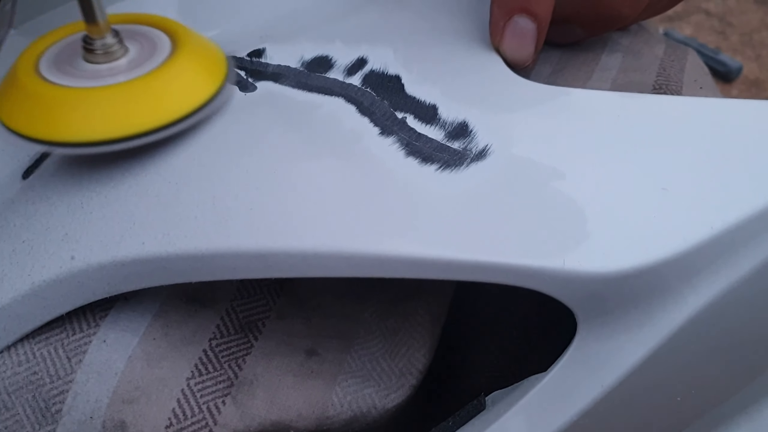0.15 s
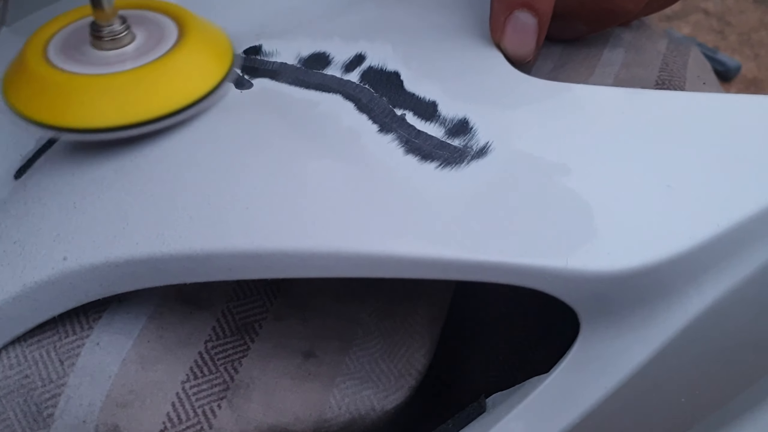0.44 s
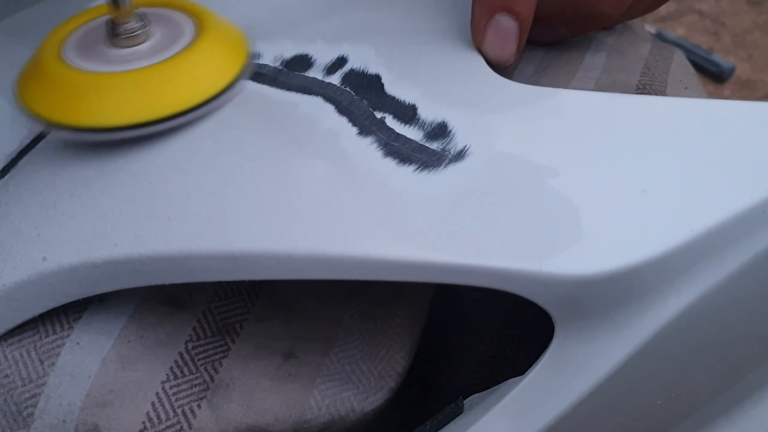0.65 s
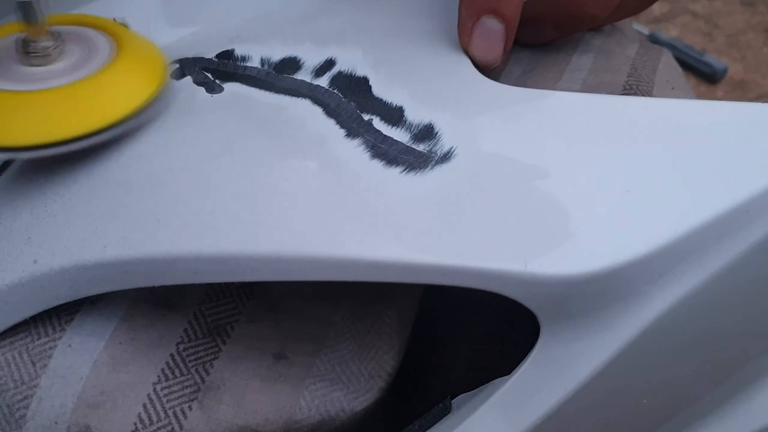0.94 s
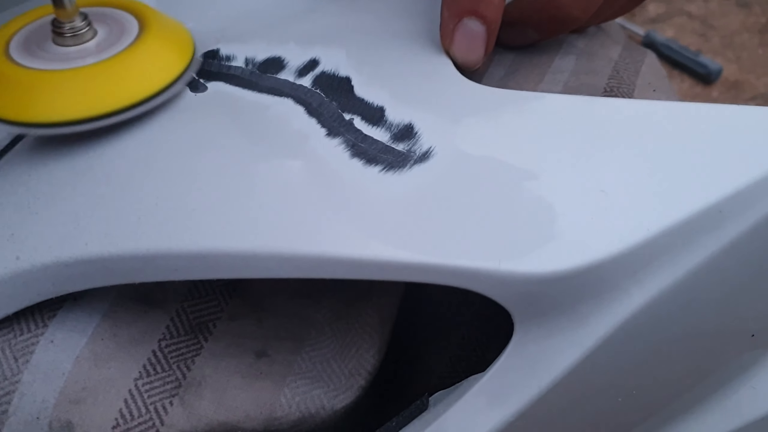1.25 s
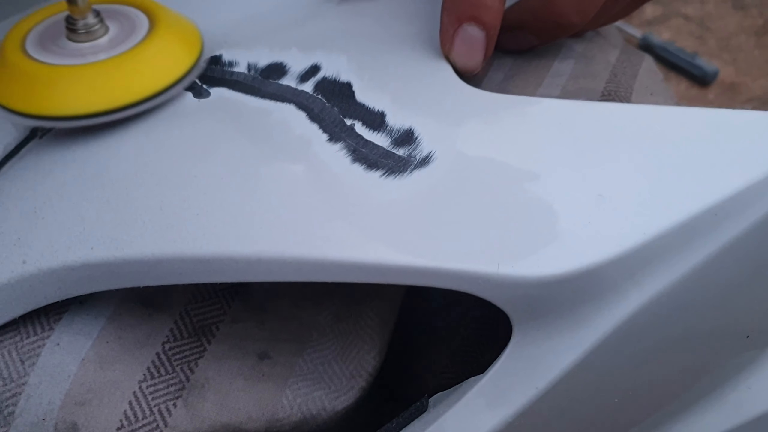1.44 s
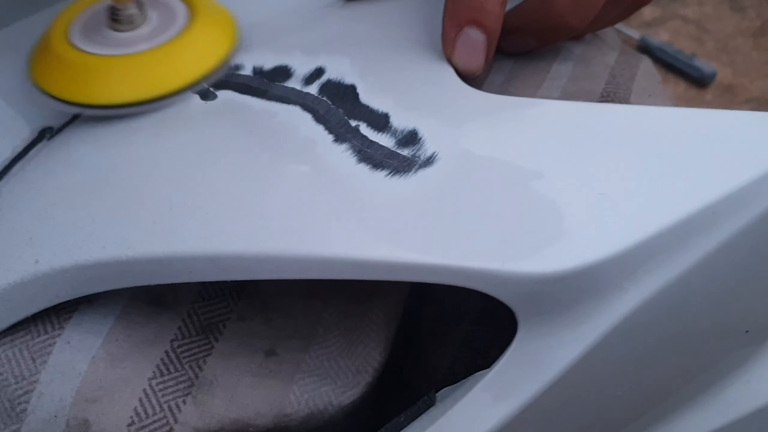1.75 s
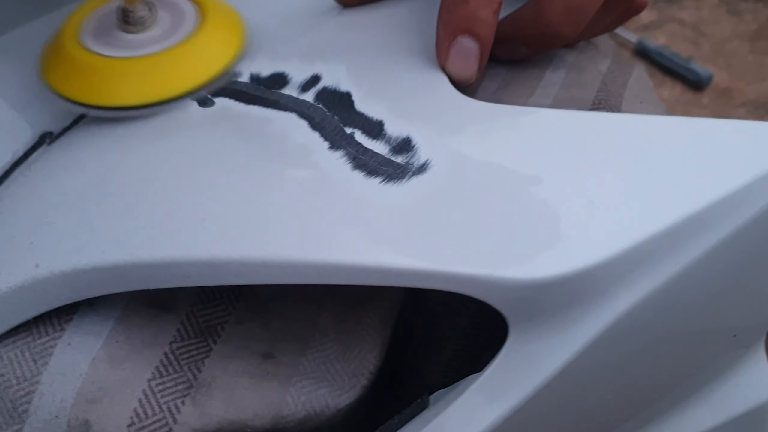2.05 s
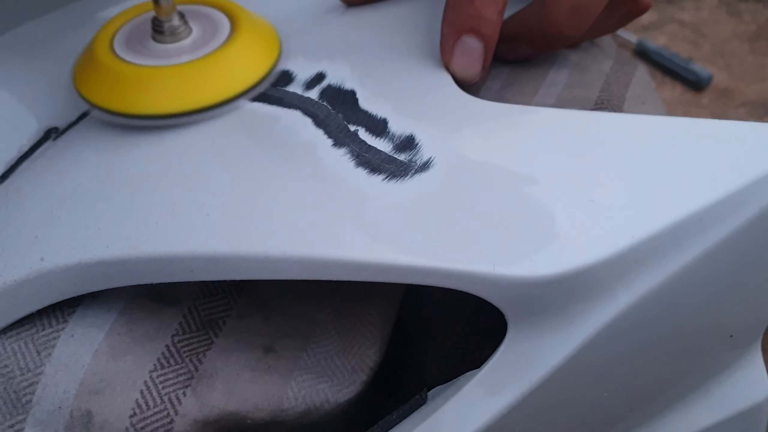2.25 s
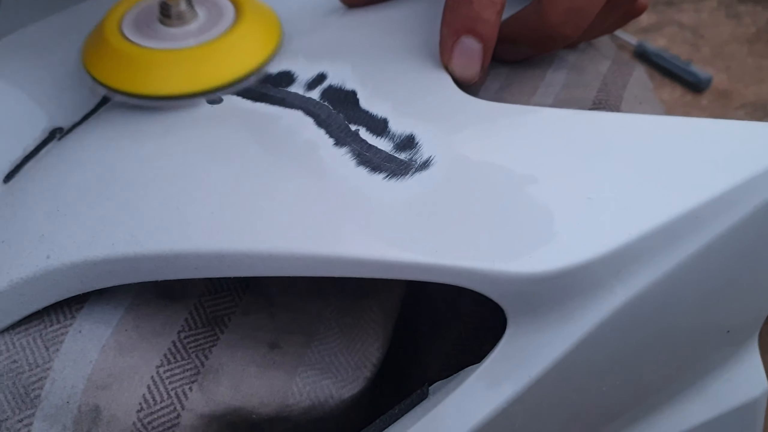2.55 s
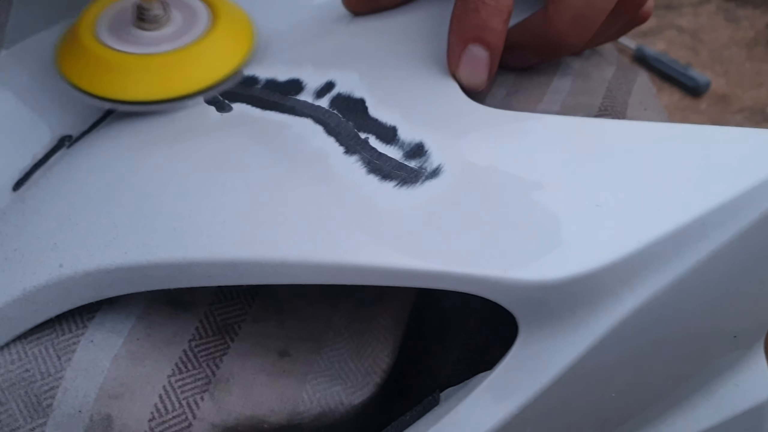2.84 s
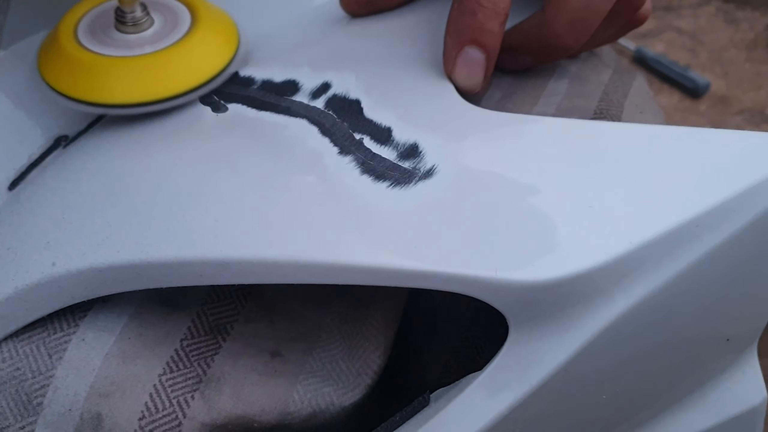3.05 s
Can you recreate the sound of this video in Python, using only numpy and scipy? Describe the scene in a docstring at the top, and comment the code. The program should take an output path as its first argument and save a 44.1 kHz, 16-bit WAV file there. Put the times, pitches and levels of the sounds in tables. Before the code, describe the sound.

A small power sander whirs and hisses close by in a garage. Its disc rasps and buzzes on a plastic panel in one pass, two quick touches and a longer pass, the motor sagging under pressure and recovering between.

```python
"""Power sander on a plastic panel

A small sander with a spinning disc is pressed four times on a plastic panel in a garage.
The disc runs off true: once per turn its edge rasps (shaped noise) and knocks the panel (pulses into modes).
The motor (shaft harmonics and fan noise) sags under load and whirs and hisses louder as it picks up again."""
import sys
import numpy as np
from scipy import signal
from scipy.fft import rfft, irfft
from scipy.io import wavfile
from scipy.ndimage import uniform_filter1d

SR = 44100
rng = np.random.default_rng(int(sys.argv[2]) if len(sys.argv) > 2 else 0)


def master_out(mix):
    """Clip the mix to full scale and print it as 16-bit PCM to the path in sys.argv[1]."""
    frames = np.transpose(np.atleast_2d(mix))
    ceiling = np.clip(frames, -1, 1)
    pcm = np.round(ceiling * 32767).astype(np.int16)
    wavfile.write(sys.argv[1], SR, pcm)


N = 141120
T = np.arange(N) / SR
HZ = np.fft.rfftfreq(N, 1 / SR)


def amp(db):
    """Decibels to gain."""
    return 10 ** (np.asarray(db) / 20)


def evened(x):
    """Scales to rms 1."""
    return x / np.sqrt(np.mean(x ** 2) + 1e-20)


def read(points, hz):
    """Reads a table on a log-frequency axis."""
    table_hz, value = np.transpose(points)
    return np.interp(np.log(hz + 1), np.log(table_hz + 1), value)


def colour(x, points):
    """Causal minimum-phase filter with the given spectrum."""
    log_gain = np.log(amp(read(points, abs(np.fft.fftfreq(N, 1 / SR)))))
    response = np.exp(np.conj(signal.hilbert(log_gain)))
    return irfft(rfft(x) * response[:len(HZ)], N)


# likeness of the two sides: [freq_hz, correlation_0_to_1]
SIDE_LIKENESS = [(100,0.75),(2000,0.97),(3000,0.16),(7000,0.077),(10000,0.23),(12000,0.3),(16000,0.32)]


def paired(two):
    """Makes two unrelated noises partly alike, as the two microphones hear them."""
    a, b = rfft(two)
    same = read(SIDE_LIKENESS, HZ)
    return irfft(np.array([a, same * a + np.sqrt(1 - same ** 2) * b]), N)


def patchy(x, depth_db):
    """Lets the colour of a noise wander at random, alike on both sides."""
    z = signal.stft(x, nperseg=256)[2]
    field = rng.standard_normal(z.shape[1:])
    field = uniform_filter1d(field, size=7, axis=0)  # across frequency
    field = uniform_filter1d(field, size=30, axis=1)  # across time
    return signal.istft(z * amp(depth_db * evened(field)), nperseg=256)[1][:, :N]


def wander(count=14):
    """A slow random curve of rms 1, from sines of 1 to 10 Hz."""
    t = np.linspace(0, T[-1], count ** 2)
    waves = sum(np.sin(2 * np.pi * (f * t + rng.random())) for f in np.geomspace(1, 10, count))
    return evened(np.interp(T, t, waves))


# one curve per touch of the disc, relative levels:
# [time_s, rasp_db, drone_db, middle_modes_db, buzz_db]
FIRST_PASS_CURVE = [(0.233, -46, -50, -36, -49), (0.253, -31, -39.5, -48, -40.5),
                    (0.299, -35, -49, -35, -55.5), (0.333, -27, -37.5, -50, -43.5),
                    (0.443, -27.5, -37.5, -48, -39.5), (0.51, -31, -42.5, -58, -39),
                    (0.637, -24, -43, -40.5, -47), (0.775, -31, -47, -52, -45.5),
                    (0.815, -46, -56, -44.5, -60)]
DAB_CURVE = [(0.863, -39, -54, -60, -47), (0.886, -26, -40.5, -42, -54), (0.951, -27, -41, -52, -44),
             (0.999, -49.5, -60, -43, -56)]
GRAZE_CURVE = [(1.226, -35, -53, -47, -41), (1.238, -25.5, -41, -48, -45.5), (1.268, -41, -49, -42, -47)]
LONG_PASS_CURVE = [(1.566, -34.5, -54, -44.5, -52), (1.579, -32.5, -43.5, -41, -41.5),
                   (1.643, -36, -48, -36, -51), (1.678, -37, -60, -49.5, -43.5),
                   (1.715, -23, -43, -46.5, -53), (1.78, -27, -43.5, -50, -47.5),
                   (1.85, -36.5, -47.5, -41, -36.5), (1.99, -25, -42.5, -45, -45.5),
                   (2.043, -25, -45.5, -49.5, -50), (2.197, -37.5, -53, -46.5, -44),
                   (2.325, -27, -50.5, -47.5, -61), (2.387, -34, -49, -48.5, -44),
                   (2.461, -43, -59.5, -47, -54), (2.571, -28, -46, -45.5, -53),
                   (2.7, -39.5, -57, -59, -46), (2.762, -36, -52, -51, -56), (2.776, -25, -50.5, -51, -61),
                   (2.83, -24.5, -49, -58, -59.5), (2.931, -43, -57, -53, -46), (2.955, -53, -69, -62, -59)]


def contact(column):
    """Gain over time from one column of the touches; silent while the disc is lifted."""
    gain = 0
    for touch in (FIRST_PASS_CURVE, DAB_CURVE, GRAZE_CURVE, LONG_PASS_CURVE):
        curve = np.array(touch)
        gain = gain + amp(np.interp(T, curve[:, 0], curve[:, column], left=-np.inf, right=-np.inf))
    return gain


def per_turn(turns, spread_db):
    """A random strength for each turn of the disc."""
    return amp(spread_db * rng.standard_normal(N))[turns.astype(int)]


def sweep(turns, width_turns, between):
    """Swells as the low edge of the disc comes round, above a constant part."""
    return between + np.exp(-.5 * ((turns % 1 - .5) / width_turns) ** 2)


def grit(hz, turns, repeat, size=512):
    """Noise of the abrasive; much the same grains come round on the next turn."""
    fresh = rng.standard_normal((2, size * 2, size))  # side, turn, sample within turn
    grains = signal.lfilter([1], [1, -repeat], fresh, axis=1)
    samples_from_mid_turn = np.floor((turns % 1 - .5) * SR / hz).astype(int)
    return grains[:, turns.astype(int), samples_from_mid_turn]


def knocks(turns, count=48):
    """One sharp pulse in the middle of every turn, built from harmonics."""
    return sum(np.cos(2 * np.pi * k * (turns - .5)) for k in range(1, count))


MODE_WANDER_DB = 2


def ring(x, modes):
    """Resonances that radiate little below their pitch; the travelling disc excites each more or less."""
    out, spectrum = 0, rfft(x)
    for pitch_hz, width_hz, level_db, change_db_per_s in modes:
        damping = 1j * HZ * width_hz
        resonance = damping / (pitch_hz ** 2 - HZ ** 2 + damping)
        radiation = np.minimum(HZ / pitch_hz, 1) ** 2
        gain = amp(level_db + change_db_per_s * T + MODE_WANDER_DB * wander())
        out = out + gain * irfft(spectrum * radiation * resonance, N)
    return evened(out)


# handling rumble and panel judder: [freq_hz, relative_db_per_hz]
RUMBLE_SPECTRUM = [(25,-14),(70,5),(220,-11.5),(600,-20.5)]
RUMBLE_DB, JUDDER_RE_RASP_CURVE_DB = -65.5, -28.5


def rumble():
    """Dull handling noise, joined by the judder of the panel when the disc bites."""
    noise = evened(colour(rng.standard_normal((2, N)), RUMBLE_SPECTRUM))
    return (amp(RUMBLE_DB) + amp(JUDDER_RE_RASP_CURVE_DB) * contact(column=1)) * noise


# panel bumps as the disc bears down: [centre_s, envelope_db]
PANEL_BUMPS = [(.352,-49),(.91,-52),(1.725,-45),(1.955,-46),(2.08,-45)]
BUMP_HZ, BUMP_SIGMA_S = 62.3, .012


def bumps():
    """The whole panel gives briefly on its soft support: a low sine under a bell envelope."""
    out = 0
    for centre_s, level_db in PANEL_BUMPS:
        t = T - centre_s
        envelope = amp(level_db) * np.exp(-.5 * (t / BUMP_SIGMA_S) ** 2)
        out = out + envelope * np.sin(2 * np.pi * BUMP_HZ * t)
    return out


# fan hiss: [freq_hz, relative_db_per_hz]
HISS_SPECTRUM = [(30,-27),(100,-2),(220,-15.5),(700,-19),(1100,-8),(1500,-7.5),(2150,1),(2900,-5.5),(4200,1),(6700,-2.5),(8500,-8.5),(13000,-4.5)]
# shaft whirr: [freq_hz, relative_db]
WHIRR_SPECTRUM = [(60,-4),(140,-1.5),(280,-14.5),(750,-17.5),(1050,-11.5),(1500,-11),(2100,-8.5),(4200,-17),(8000,-38.5)]
FREE_HZ, HISS_DB, WHIRR_DB = 141.7, -39, -47  # levels at FREE_HZ, before the fade
MOTOR_DB_PER_OCTAVE, FADE_DB_PER_S = 11, -0.92


def motor(hz, turns, count=48):
    """Wavering shaft harmonics and fan noise, both louder with speed."""
    orders = 0
    for k in range(1, count):
        orders = orders + amp(2 * wander()) * np.cos(2 * np.pi * (k * turns + rng.random()))
    whirr = evened(colour(orders, WHIRR_SPECTRUM))
    air = rng.standard_normal((2, N))
    hiss = evened(patchy(colour(paired(air), HISS_SPECTRUM), depth_db=1.24))
    gain = amp(MOTOR_DB_PER_OCTAVE * np.log2(hz / FREE_HZ) + FADE_DB_PER_S * T)
    return gain * (amp(WHIRR_DB) * whirr + amp(HISS_DB) * hiss)


# low answer of the panel to each knock: [freq_hz, relative_db]
DRONE_SPECTRUM = [(45,-21),(115,8),(150,0),(250,6.5),(350,-3),(450,5),(580,-6),(720,-4.5),(1200,-14.5),(3000,-33)]
# crack of each knock on the panel's skin: [freq_hz, relative_db]
CRACK_SPECTRUM = [(300,-20),(1400,-0.5),(2400,-5.5),(4300,-4),(9000,-14.5)]
# panel resonances: [pitch_hz, width_hz, relative_db, change_db_per_s]
MIDDLE_PANEL_MODES = [(775,60,6,-0.5),(939,50,8,2.5),(1102,118,-0.5,4)]
UPPER_PANEL_MODES = [(1216,66,-4,1),(1483,75,4.5,-0.48),(1677,115,2,1),(1980,160,-5.5,0.4)]
DRONE_TRIM_DB, MIDDLE_TRIM_DB, UPPER_TRIM_DB, CRACK_TRIM_DB = 2.5, 0.5, 0.5, -0.5
KNOCK_VARY_DB = 2


def panel(turns):
    """Each knock flexes the panel (a drone), cracks on its skin and rings its modes (a buzz)."""
    drive = knocks(turns) * per_turn(turns, KNOCK_VARY_DB)
    drone = amp(DRONE_TRIM_DB) * contact(column=2) * evened(colour(drive, DRONE_SPECTRUM))
    middle = amp(MIDDLE_TRIM_DB) * contact(column=3) * ring(drive, MIDDLE_PANEL_MODES)
    upper = amp(UPPER_TRIM_DB) * ring(drive, UPPER_PANEL_MODES)
    crack = amp(CRACK_TRIM_DB) * evened(colour(drive, CRACK_SPECTRUM))
    return drone + middle + contact(column=4) * (upper + crack)


# scouring of the whole disc face: [freq_hz, relative_db_per_hz]
SCOUR_SPECTRUM = [(25,-45),(150,-17),(600,-16.5),(1500,-7),(2400,-2),(3200,-0.5),(4500,-1.5),(6500,-7.5),(8300,-8),(16000,-10)]
SCOUR_TRIM_DB, SCOUR_WIDTH_TURNS, SCOUR_BETWEEN = -5.5, 0.56, 0.93
SCOUR_FOLLOW, SCOUR_REPEAT = 0.68, .72  # exponent on the buzz curve; carry-over per turn


def scour(hz, turns):
    """The face of the disc rubs all through the turn, swelling less than the buzz does."""
    rub = grit(hz, turns, SCOUR_REPEAT) * sweep(turns, SCOUR_WIDTH_TURNS, SCOUR_BETWEEN)
    sound = evened(patchy(colour(paired(rub), SCOUR_SPECTRUM), depth_db=2.5))
    return amp(SCOUR_TRIM_DB) * contact(column=4) ** SCOUR_FOLLOW * sound


# grit on plastic: [freq_hz, relative_db_per_hz]
RASP_SPECTRUM = [(25,-53),(150,-13.5),(700,-17.5),(2000,-12),(3500,-17),(5200,-6),(7000,-7),(8300,-10.5),(10000,1),(11500,-0.5),(13000,2),(14500,4.5),(16000,-6.5)]
RASP_TRIM_DB, RASP_WIDTH_TURNS, RASP_BETWEEN = 3.5, 0.11, 0.13
RASP_VARY_DB, RASP_PATCHY_DB, RASP_REPEAT = 1.5, 2, 0.6  # repeat: carry-over per turn
DRIFT_DB_PER_S = -1  # left minus right


def rasp(hz, turns):
    """The low edge of the disc bites once a turn; it travels slowly to the right."""
    bursts = grit(hz, turns, RASP_REPEAT) * sweep(turns, RASP_WIDTH_TURNS, RASP_BETWEEN)
    bursts = bursts * per_turn(turns, RASP_VARY_DB)
    sound = evened(patchy(colour(paired(bursts), RASP_SPECTRUM), RASP_PATCHY_DB))
    drift = amp(np.outer([.5, -.5], DRIFT_DB_PER_S * (T - T.mean())))
    return amp(RASP_TRIM_DB) * contact(column=1) * sound * drift


# garage decay: [freq_hz, t60_s]
GARAGE_DECAY = [(1500,0.1),(16000,0.017)]
GARAGE_DB, GARAGE_LOW_CUT_HZ = -8.5, 700


def garage(x, count=12):
    """A short diffuse tail of decaying noise whose echoes change as the tool moves."""
    wet = 0
    for place in range(count):
        hz, t, z = signal.stft(rng.standard_normal((2, SR // 4)), SR, nperseg=256)
        decay = amp(-60 * t / read(GARAGE_DECAY, hz)[:, None])
        tail = signal.istft(z * decay, SR, nperseg=256)[1]
        tail = tail / np.linalg.norm(tail[0])
        # equal-power crossfade from place to place
        share = np.sqrt(np.maximum(1 - abs(T / T[-1] * (count - 1) - place), 0))
        wet = wet + signal.oaconvolve(x * share, tail, axes=1)[:, :N]
    low_cut = signal.butter(2, GARAGE_LOW_CUT_HZ, "high", fs=SR, output="sos")
    return signal.sosfilt(low_cut, wet)


# shaft speed: [time_s, turns_per_s]
SHAFT_SPEED = [(0, 132), (.23, 152), (.33, 152.5), (.53, 130), (.7, 116.3), (.8, 117), (.87, 129),
               (.97, 118.5), (1.12, 137.5), (1.27, 143), (1.55, 161), (1.69, 157.4), (1.84, 146.4),
               (2.02, 137), (2.13, 122), (2.22, 122.3), (2.32, 123), (2.41, 120.3), (2.56, 127),
               (2.67, 119), (2.78, 123.7), (2.92, 115.5), (3.2, 141.4)]
START_TURNS = .43


def scene():
    """One shaft speed drives the turning layers; the garage answers them all."""
    hz = np.interp(T, *np.transpose(SHAFT_SPEED))
    turns = START_TURNS + np.cumsum(hz) / SR
    dry = rumble() + bumps() + motor(hz, turns) + panel(turns) + scour(hz, turns) + rasp(hz, turns)
    return dry + amp(GARAGE_DB) * garage(dry)


# microphone colour: [freq_hz, left_minus_right_db]
MIC_BALANCE = [(100,3.5),(500,4.5),(1200,3.5),(3100,3.5),(4300,-2),(5400,-6.5),(7000,-5.5),(8800,5),(10500,-0.5),(12000,-5.5),(14000,-0.5),(16000,-14)]
LEFT_LEAD_S, BAND_EDGE_HZ = 0.00019, 15940


def record(dry):
    """Two microphones of unlike colour, the left a little nearer; then the band limit."""
    balance = amp(np.outer([.5, -.5], read(MIC_BALANCE, HZ)))
    delay = np.exp(-2j * np.pi * np.outer([0, LEFT_LEAD_S], HZ))
    heard = irfft(rfft(dry) * balance * delay, N)
    low_pass = signal.firwin(511, BAND_EDGE_HZ, window=("kaiser", 9), fs=SR)
    return signal.oaconvolve(heard, low_pass[None], "same")


dry = scene()
out = record(dry)
master_out(out)
```